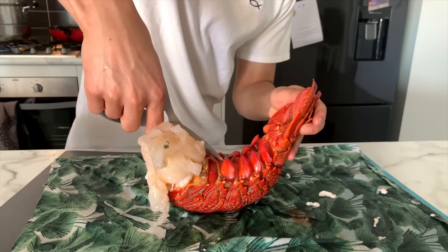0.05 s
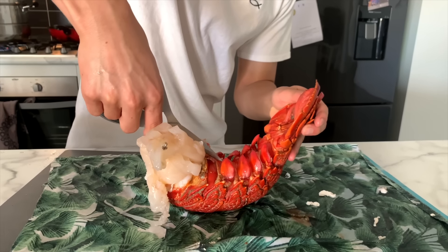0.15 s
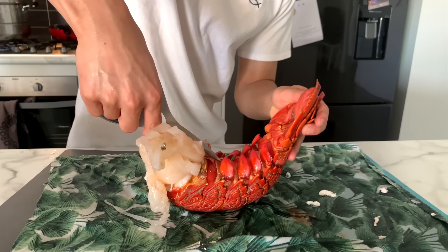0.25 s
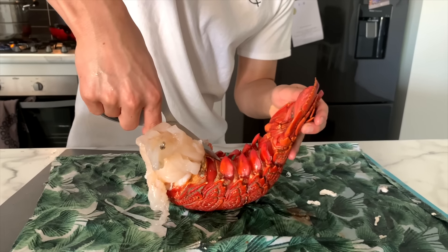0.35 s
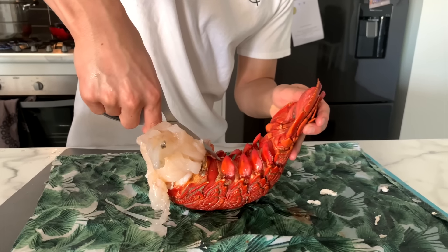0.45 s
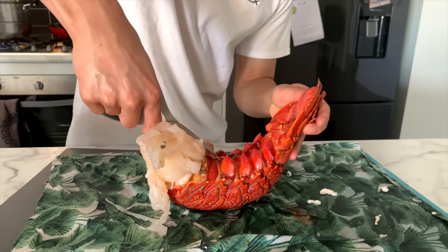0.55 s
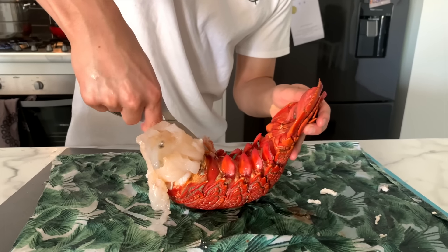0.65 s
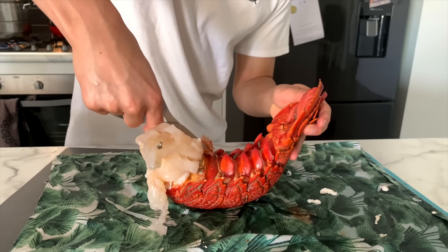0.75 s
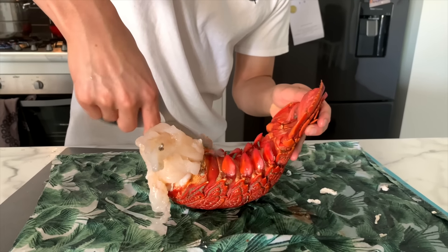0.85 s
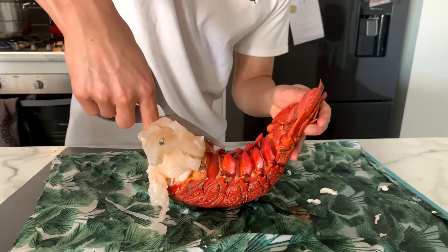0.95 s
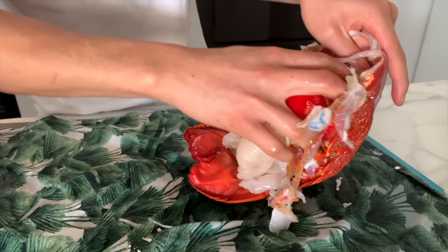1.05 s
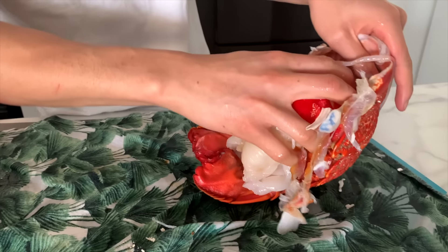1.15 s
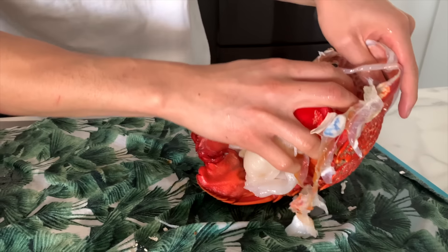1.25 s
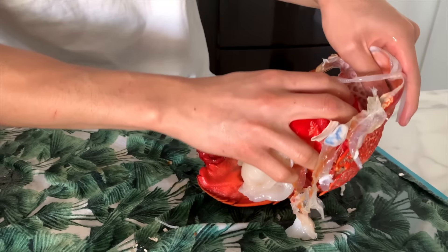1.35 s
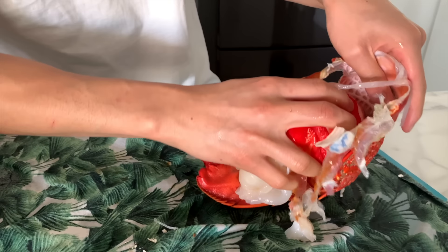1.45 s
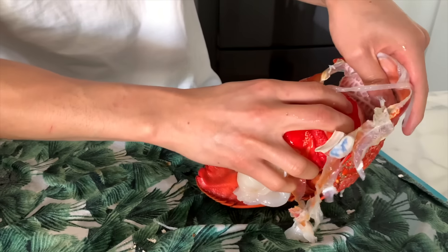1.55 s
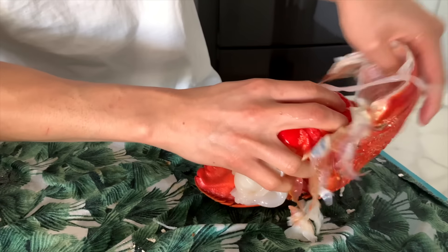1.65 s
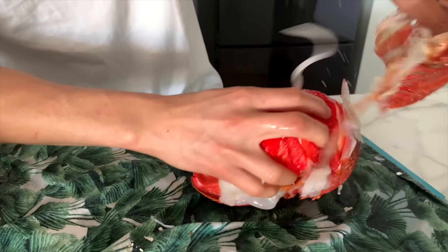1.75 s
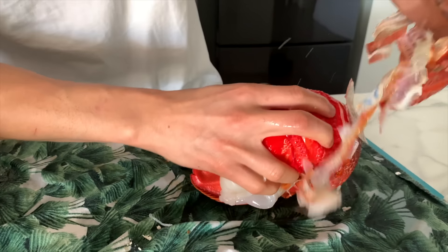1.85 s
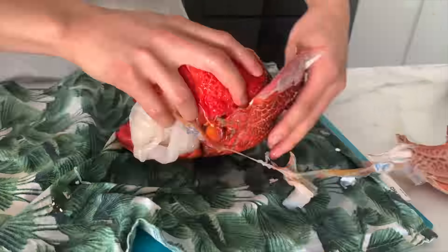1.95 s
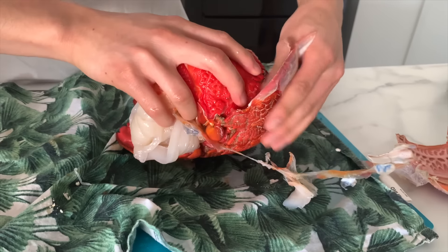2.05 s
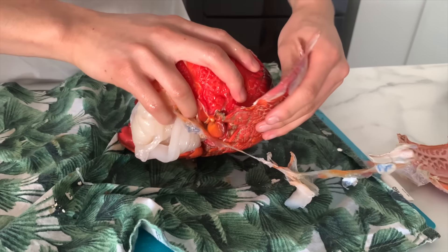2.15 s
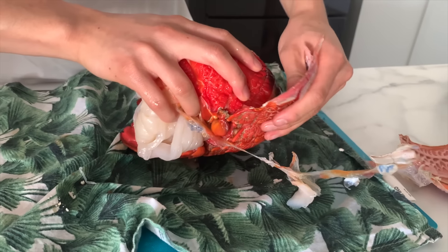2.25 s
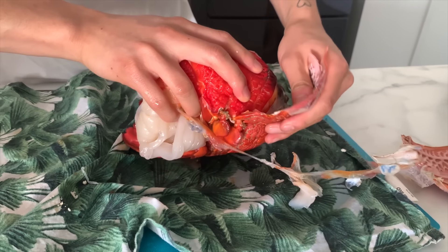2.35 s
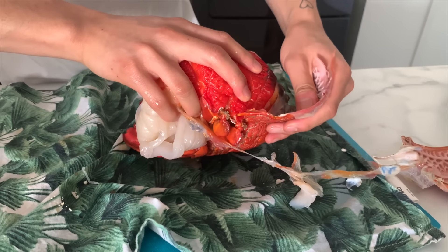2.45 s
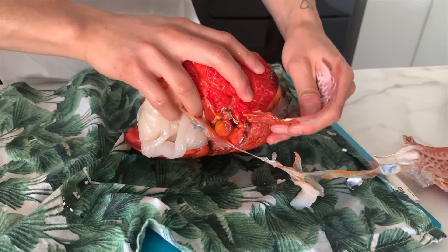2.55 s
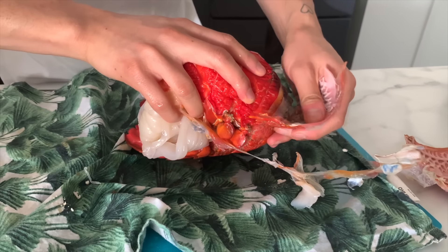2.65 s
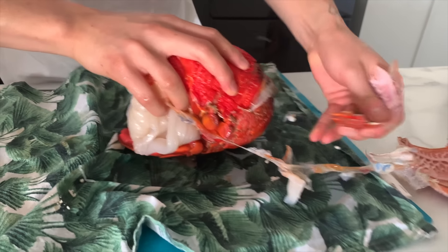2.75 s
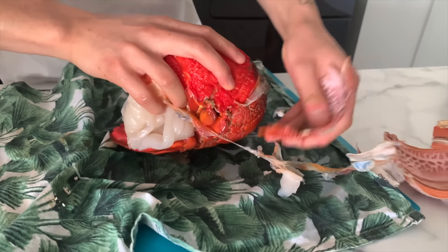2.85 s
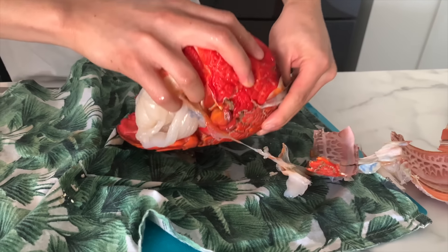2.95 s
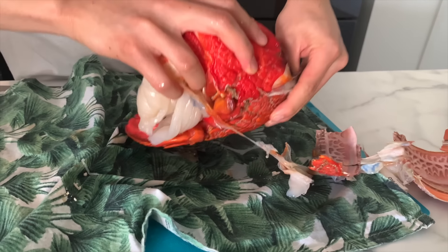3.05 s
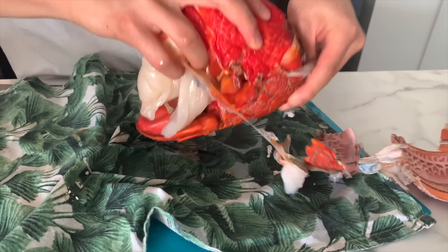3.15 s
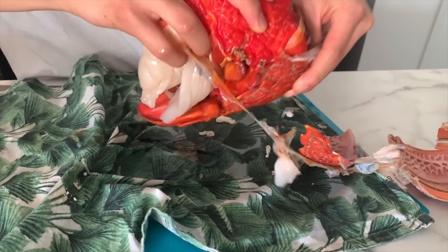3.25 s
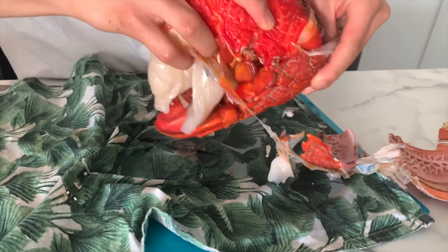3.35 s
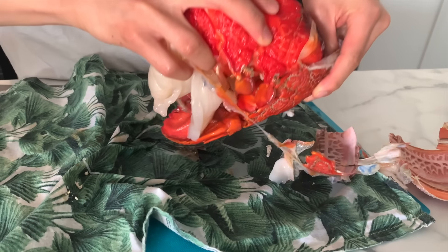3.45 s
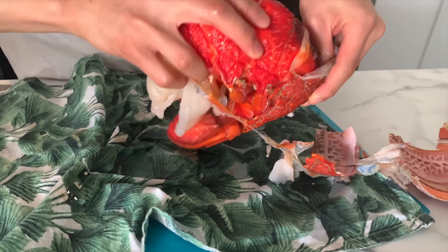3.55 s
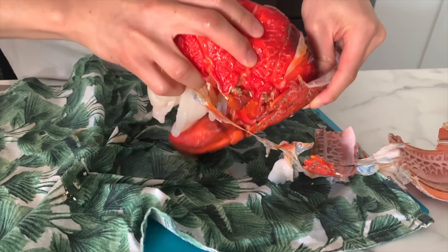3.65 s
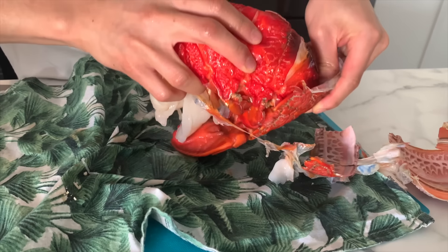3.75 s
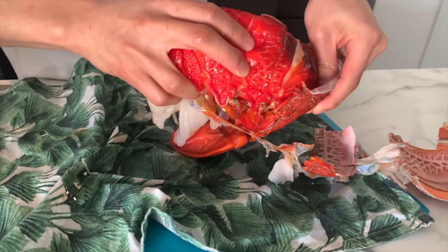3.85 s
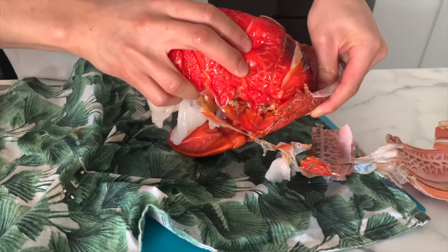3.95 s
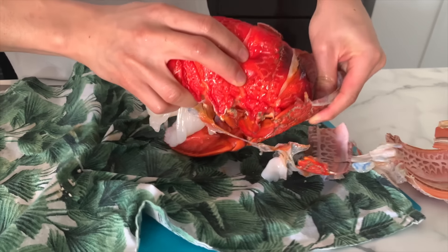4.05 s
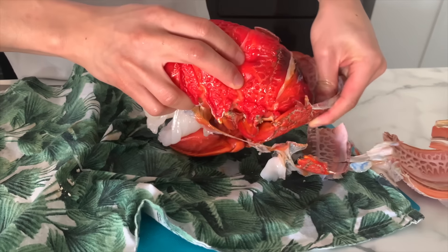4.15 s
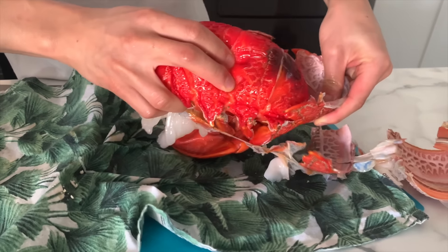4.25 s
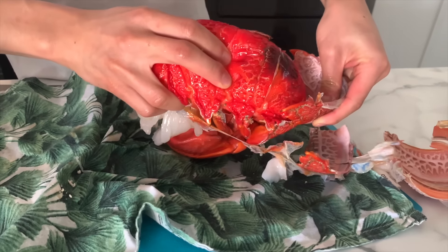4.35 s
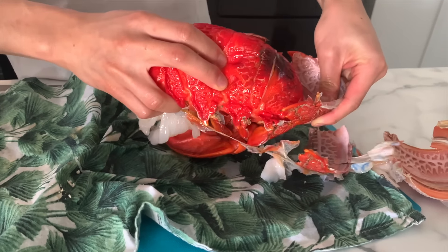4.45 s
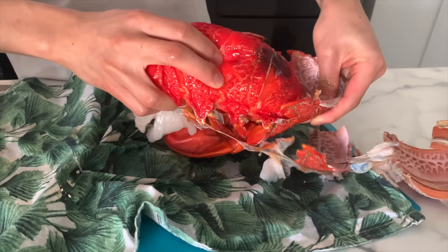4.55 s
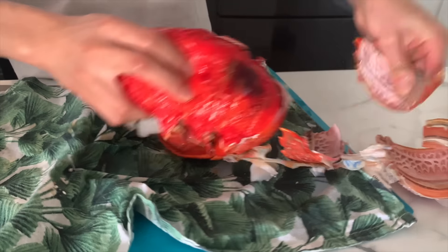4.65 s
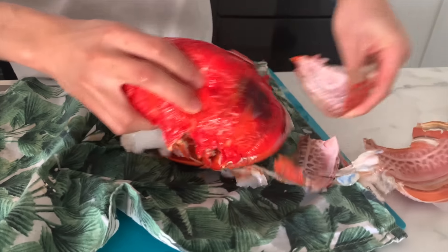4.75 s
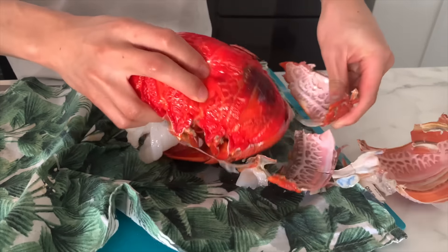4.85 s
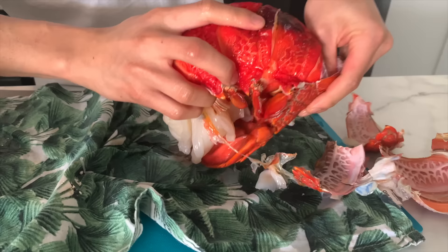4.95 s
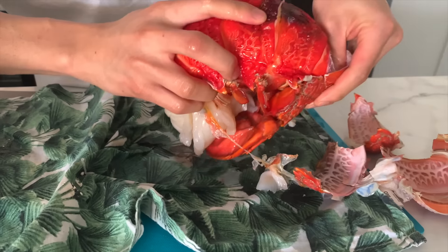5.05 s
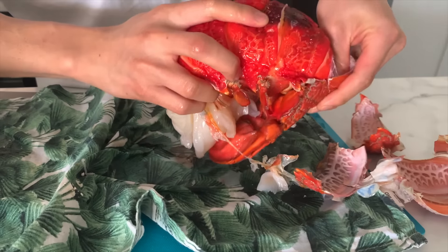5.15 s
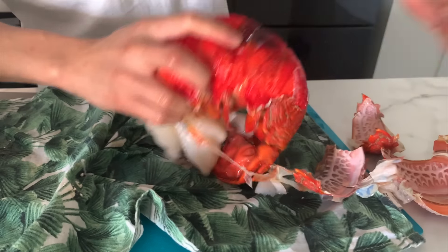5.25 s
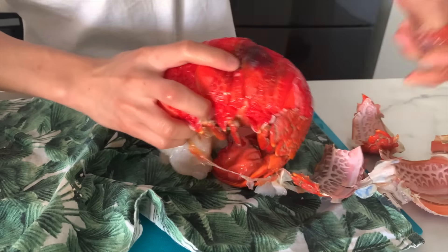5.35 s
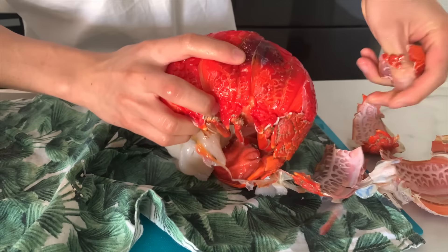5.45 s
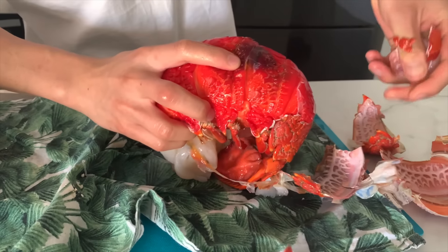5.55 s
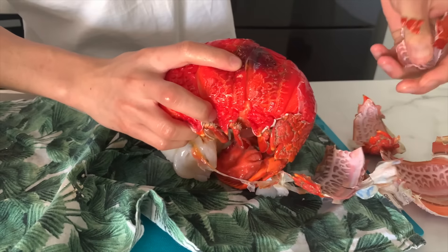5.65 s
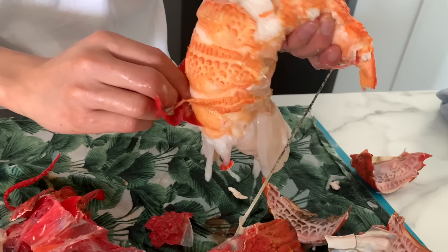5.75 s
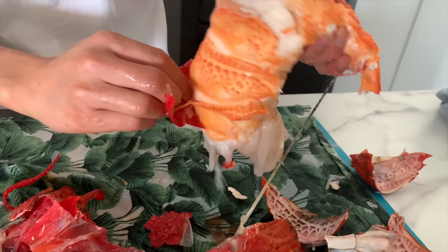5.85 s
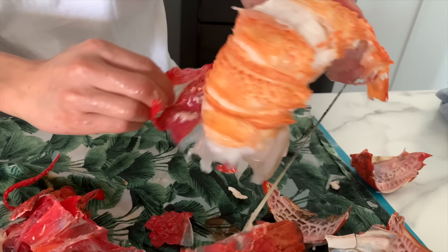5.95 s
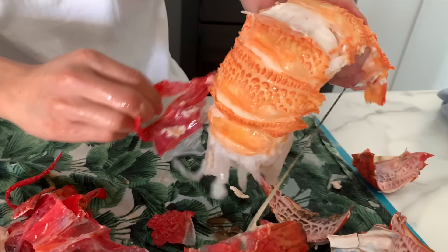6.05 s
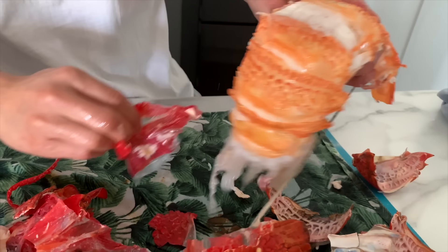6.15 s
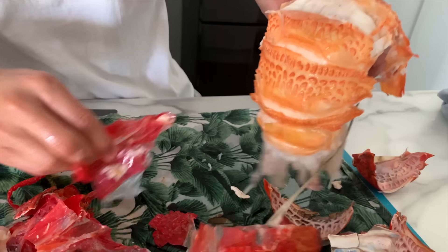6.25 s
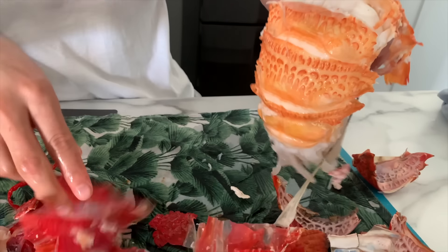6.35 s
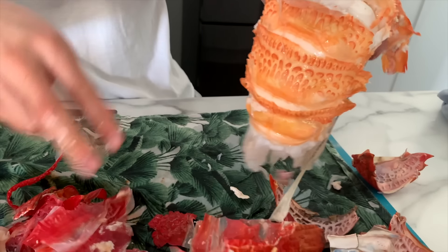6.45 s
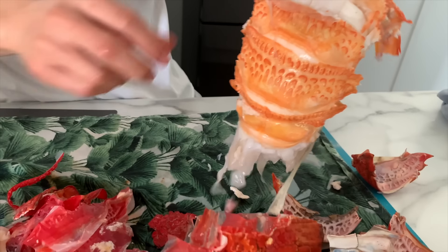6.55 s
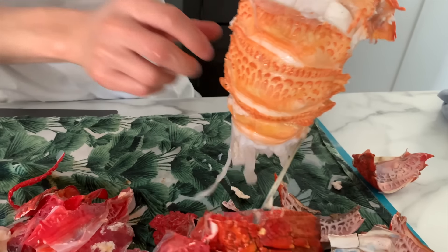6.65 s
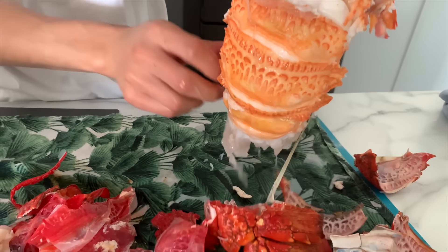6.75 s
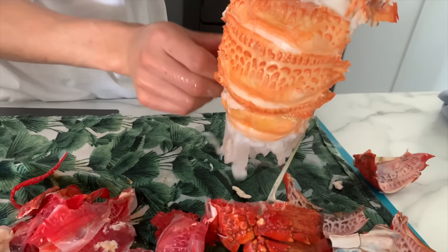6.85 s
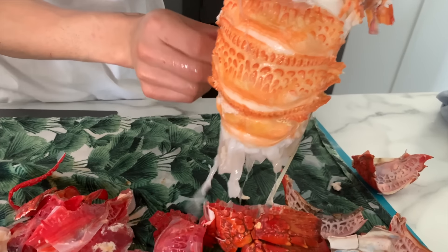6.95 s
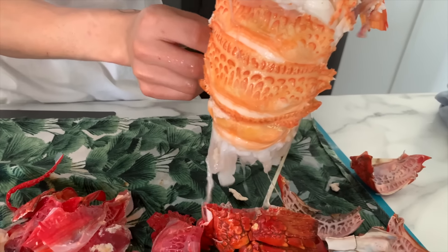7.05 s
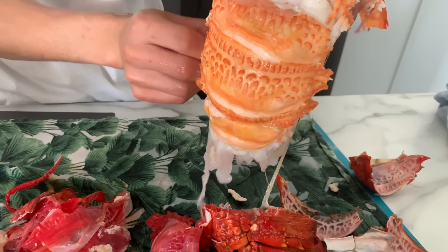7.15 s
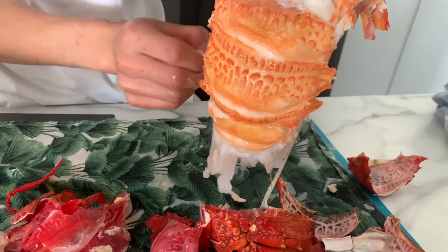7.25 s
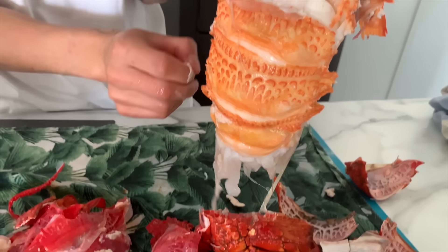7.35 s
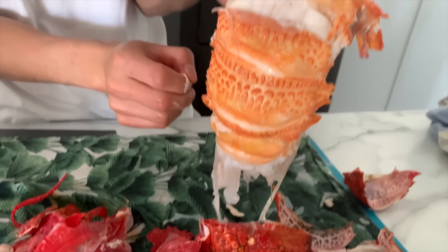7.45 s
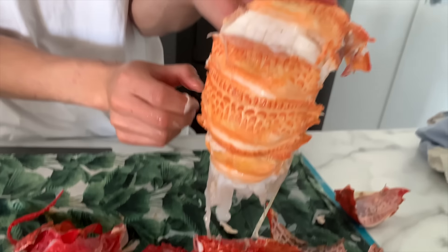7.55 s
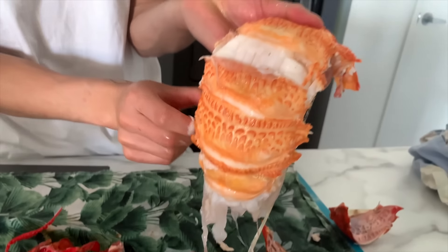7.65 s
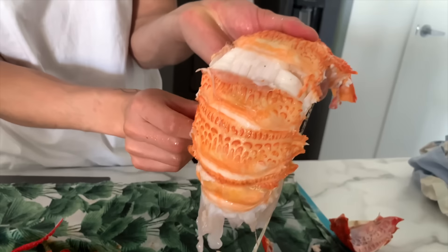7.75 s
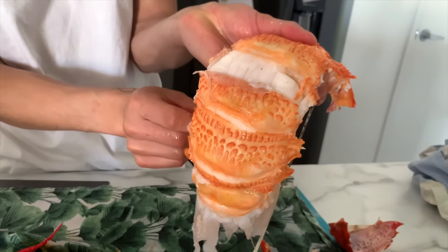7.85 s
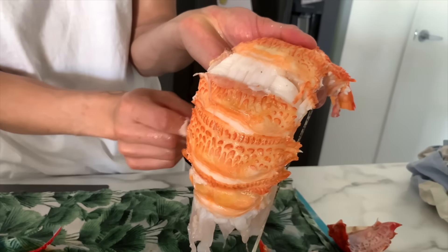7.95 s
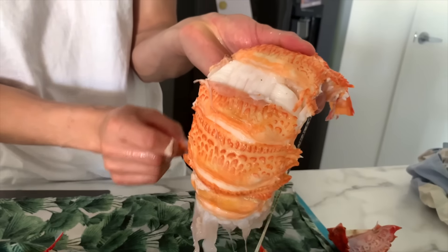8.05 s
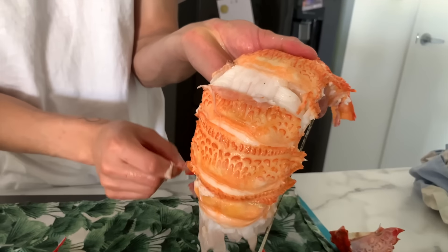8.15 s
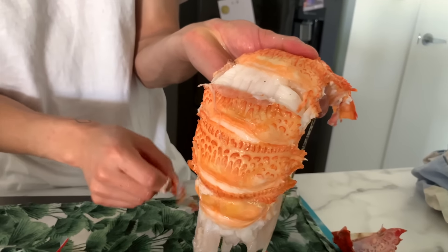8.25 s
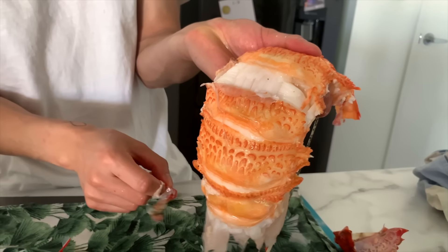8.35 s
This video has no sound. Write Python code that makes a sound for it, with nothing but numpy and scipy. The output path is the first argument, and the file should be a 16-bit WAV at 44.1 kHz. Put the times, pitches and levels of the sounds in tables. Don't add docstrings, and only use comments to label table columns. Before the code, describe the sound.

In a hard, bare kitchen with a low steady appliance hum and faint hiss, hands work a lobster shell very close to a stereo microphone. From 0 to 0.35 s fingers slide and small slivers click. Snaps start near 0.4 s, with a sharper split and wet rip at 0.6 s. A loud cluster cracks at 1.2-1.4 s, another with tearing and squelching at 1.55-1.65 s. A soft board knock comes at 2.0 s, then snaps at 2.2 and 2.6 s, and single or paired breaks around 3.0, 3.5, 3.9 and 4.15 s. Dense, overloaded bursts hit at 4.55 and 5.15 s. Each rings briefly off the walls, the tail sometimes cut short. A hollow pop sounds at 5.4 s. Light clicks, knocks and membrane rustle follow near 5.7-6 s, a soft pop at 6.5 s, then almost only hum and faint ticks until 8.4 s.

```python
import sys
import numpy as np
from scipy import signal
from scipy.fft import rfft, irfft
from scipy.io import wavfile
from scipy.ndimage import uniform_filter1d, minimum_filter1d

SR = 44100
rng = np.random.default_rng(int(sys.argv[2]) if len(sys.argv) > 2 else 0)


def transcribe(u):
    v = np.clip(np.atleast_2d(u).T, -1, 1)
    q = np.round(v * 32767).astype(np.int16)
    wavfile.write(sys.argv[1], SR, q)


def decibels_to_gain(level_db):
    exponent = np.asarray(level_db, float) / 20
    return 10 ** exponent


N = 370440

# pitch_hz, likeness (-1 to 1)
LEFT_RIGHT_LIKENESS = [(60, 0.91), (240, 0.97), (950, -0.027), (3770, -0.24), (15000, 0.76)]


def at_hz(points, hz, order=1):
    table = np.array(points)
    return np.interp(np.log(hz + 1), np.log(table[:, 0] + 1), table[:, order])


def rms_one(x):
    return x / np.sqrt(np.mean(x ** 2) + 1e-20)


def resonance(x, hz, width_hz):
    r = np.exp(-np.pi * width_hz / SR)
    turn = 2 * r * np.cos(2 * np.pi * hz / SR)
    return signal.lfilter([(1 - r * r) / 2, 0, (r * r - 1) / 2], [1, -turn, r * r], x)


def band(x, low_hz, high_hz):
    sos = signal.butter(2, [low_hz, min(high_hz, .45 * SR)], "band", fs=SR, output="sos")
    return signal.sosfilt(sos, x)


def add(out, s, sound):
    at = max(round(s * SR), 0)
    out[:, at:at + sound.shape[1]] += sound[:, :N - at]


def widen(mid, side, hz):
    alike = at_hz(LEFT_RIGHT_LIKENESS, hz)
    return np.sqrt(1 + alike) * mid + np.sqrt(1 - alike) * side * [[1], [-1]]


def hum():
    # pitch_hz, level_db per Hz
    air_colour = [(15, -35), (63, -2.5), (209, -13), (450, -22), (1150, -10.5), (2290, -24), (6500, -36.5),
                  (14300, -40.5)]
    # time_s, level_db
    air_level = [(0.0, -56.5), (1.24, -55), (1.349, -51.5), (2.24, -57.5), (5.01, -53), (5.31, -61),
                 (5.78, -54.5), (8.4, -55.5)]
    # pitch_hz, width_hz, level_db
    air_whistles = [(66, 14, -69.5), (121, 14, -73.5), (1065, 300, -71.5), (2240, 300, -74),
                    (7660, 330, -71.5), (10180, 2200, -79.5), (13300, 2000, -76.5)]
    hz = np.fft.rfftfreq(N, 1 / SR)
    colour = decibels_to_gain(at_hz(air_colour, hz))
    mid, side = rfft(rng.standard_normal((2, N))) * colour
    air = rms_one(irfft(widen(mid, side, hz), N))
    white = irfft(rfft(air) / colour, N)
    whistles = 0
    for pitch_hz, width_hz, level_db in air_whistles:
        tone = resonance(resonance(white, pitch_hz, width_hz), pitch_hz, width_hz)
        whistles = whistles + decibels_to_gain(level_db) * rms_one(tone)
    time_s, level_db = np.transpose(air_level)
    return decibels_to_gain(np.interp(np.arange(N) / SR, time_s, level_db)) * air + whistles


def kitchen(dry, build_s=0.0017):
    # pitch_hz, level_db, t60_s (time to fall by 60 dB)
    room_ring = [(200, -53.5, 0.87), (504.4, -51.5, 0.83), (1220, -49.5, 1.3), (2300, -44.5, 0.92),
                 (4500, -43.5, 0.84), (9075, -49, 0.62), (15360, -60, 0.62)]
    scene_changes = [0, 1.003, 1.988, 2.94, 4.973, 5.758, 8.4]
    t = np.arange(SR) / SR
    echoes = rng.random(SR) < 250 / SR
    sparse = 1 + 96 * uniform_filter1d(1. * echoes, size=24) * np.exp(-t / 0.015)
    white = rng.standard_normal((2, 2, SR)) * sparse
    tail, edges = 0, 120 * 2 ** np.arange(0, 7.1, .5)
    for k, (low, high) in enumerate(zip(edges, edges[1:])):
        hz = np.sqrt(low * high)
        decay_db = at_hz(room_ring, hz) - 60 * t / at_hz(room_ring, hz, order=2)
        mid, side = band(white[k % 2], low, high) * decibels_to_gain(decay_db)
        tail = tail + widen(mid, side, hz)
    tail = tail * (1 - np.exp(-t / build_s))
    out = np.zeros((2, N))
    cuts = [round(s * SR) for s in scene_changes]
    for a, b in zip(cuts, cuts[1:]):
        source = dry[:, a:b].mean(axis=0, keepdims=True)
        out[:, a:b] = signal.fftconvolve(source, tail, axes=1)[:, :b - a]
    return out


def knocks():
    # start_s, peak_db, pitch_hz, t60_s (time to fall by 60 dB)
    board_knocks = [(0.61, -42.5, 125, 0.1), (0.82, -45, 121, 0.075), (1.62, -33, 283, 0.085),
                    (2.024, -27, 350, 0.044), (2.26, -30, 464, 0.025), (2.621, -45, 117, 0.11),
                    (2.815, -30, 267.6, 0.073), (4.889, -29, 620, 0.02), (5.075, -50, 108.4, 0.15),
                    (5.865, -27, 416, 0.021), (5.928, -28.5, 160, 0.022)]
    out, t = np.zeros((2, N)), np.arange(5000) / SR
    noises = rng.standard_normal((len(board_knocks), 2, len(t)))
    for (s, peak_db, hz, t60), noise in zip(board_knocks, noises):
        shape = (1 - np.exp(-t / 0.012)) * decibels_to_gain(-60 * t / t60)
        puff = rms_one(band(band(noise, 250, 1100), 150, 1400)) * np.exp(-t / .015)
        tone = .75 * np.sin(2 * np.pi * hz * t)
        add(out, s, decibels_to_gain(peak_db + 12.5) * shape * (tone + .8 * puff))
    return out


def rustles(per_s=2000, spread_db=2.0, fade_db=7.5):
    # start_s, length_s, level_db
    tears = [(.187, .025, -41), (.19, 0.27, -43.5), (.575, 0.052, -29.5), (.78, 0.086, -38.5),
             (1.59, 0.062, -23), (2.19, 0.21, -35), (4.99, 0.089, -54.5), (5.75, 0.27, -61),
             (5.81, .24, -44.5), (6.29, 0.089, -53.5), (7.95, .07, -54)]
    # start_s, length_s, level_db
    slides = [(0, 0.203, -51), (.97, 0.19, -60), (1.954, 0.41, -57.5), (2.64, 0.15, -33), (2.99, .2, -43.5),
              (4.11, 0.22, -37), (4.521, 0.011, -30.5), (5.119, .022, -27), (5.25, 0.4, -36.5),
              (6.55, 0.16, -59.5), (6.8, 0.12, -62.5), (7.23, 0.16, -66), (8.25, 0.027, -68.5)]
    # start_s, length_s, level_db
    squelches = [
        (.05, 0.61, -54),
        (.581, 0.037, -33),
        (1.6, .05, -30.5),
        (2.66, 0.098, -36.5),
        (3.04, .08, -42.5),
        (4.53, .06, -25),
        (6.54, 0.14, -52.5),
    ]
    # start_s, length_s, level_db
    palms = [
        (1.98, 0.16, -47.5),
        (2.58, 0.075, -53),
        (2.77, .17, -44),
        (5.82, 0.227, -48.5),
    ]
    kinds = [(tears, (2300, 12500)), (slides, (1800, 6000)),
             (squelches, (750, 1960)), (palms, (200, 800))]
    wander = signal.lfilter([1], [1, -.998], rng.standard_normal(N))
    clumps = decibels_to_gain(6.3 * rms_one(wander))
    sizes = decibels_to_gain(spread_db * np.minimum(rng.exponential(1, N), 5)) * rng.choice([-1, 1], N)
    clicks = sizes * (rng.random(N) < per_s * clumps / SR)
    grains = clicks + 0.31 * rng.standard_normal((2, N))
    out = np.zeros((2, N))
    for moves, (low_hz, high_hz) in kinds:
        for s, length, level_db in moves:
            move = grains[:, round(s * SR):round((s + length) * SR)]
            count = move.shape[1]
            swell = signal.windows.tukey(count, .4) * decibels_to_gain(np.linspace(0, -fade_db, count))
            rub = band(band(move, low_hz, high_hz), 0.52 * low_hz, 3.4 * high_hz)
            add(out, s, decibels_to_gain(level_db) * swell * rms_one(rub))
    return out


def fractures():
    # start_s, level_db, pitch_hz
    splits = [(0.4789, -20, 4460), (0.5982, -6, 5280), (1.5679, -8, 1972), (1.6098, 3.86, 4190),
              (1.6346, 0, 1481), (2.2099, -17, 3244), (2.3153, -18, 4030), (2.3314, -18.5, 3310),
              (2.4816, -15.5, 5930), (2.5714, -13.5, 3120), (2.5865, 2, 3180), (2.606, 2.5, 2937),
              (3.5533, -3, 3830), (3.5762, -7, 5010), (3.7064, -10.5, 4870), (3.8123, -23.5, 3166),
              (3.8484, -16, 3755), (4.1371, 5, 2950), (4.2153, -14, 2980), (4.5325, 4, 5320),
              (4.5395, -1.9, 2990), (4.5612, 4, 2980), (4.571, 0.5, 2896), (5.1345, 4, 3940),
              (5.1581, -5, 3005), (5.1611, -2, 4827), (5.6538, -17.5, 4260), (5.9748, -15, 2130),
              (6.9591, -44.5, 6000), (8.3705, -43, 4820)]
    # start_s, level_db, pitch_hz
    clean_snaps = [(0.3796, -13.5, 4040), (0.7974, -25.5, 3540), (0.8073, -15.5, 4500),
                   (1.1891, -0.2, 1950), (1.2093, -0.9, 1800), (1.228, -3.5, 1800), (1.3572, 1.5, 1740),
                   (1.5482, -6.5, 2620), (1.6125, -2.5, 4000), (1.6288, -3.5, 2797), (2.1952, -15, 3190),
                   (2.2244, 2, 3300), (2.2366, -2, 2940), (2.2657, -14, 2240), (2.6159, -18.5, 4370),
                   (2.9619, -19.5, 4400), (3.0361, 0.5, 2070), (3.4364, 1, 2350), (3.9075, 4, 2670),
                   (4.1408, -2, 4500), (4.5424, -1, 5274), (4.546, -7, 4000), (5.1376, -1.5, 2600),
                   (5.1462, 0.5, 3180), (5.183, -6.5, 2543), (5.6573, -30.5, 2460), (5.8468, -29.5, 2080)]
    # start_s, level_db,
    # pitch_hz
    cracks = [(0.3553, -29.5, 4360), (0.5901, -17, 4590), (0.7839, -24.5, 4400), (1.207, -3.5, 2057),
              (1.3674, -12, 3900), (1.5222, -24, 2444), (1.5538, -4, 1711), (1.6173, -9, 4003),
              (1.6261, -15.5, 1742), (2.5926, -13, 2574), (2.5963, -12, 4208), (3.0616, -7, 2360),
              (3.4464, -12.5, 3425), (3.527, 0.9, 2487), (3.536, -9, 2710), (3.9172, -7.5, 3845),
              (4.1168, -21, 2280), (4.1266, -12, 2713), (4.1507, -12, 3272), (4.2043, -4.5, 3136),
              (4.5366, 0.5, 3311), (4.5518, -17.5, 3840), (5.1508, -4.5, 5004), (5.1648, -14, 4473),
              (5.1834, -3.5, 4200), (5.1868, -15, 4100), (5.1887, -1, 4140), (1.2287, -4.5, 4900)]
    # start_s, level_db, pitch_hz
    pops = [
        (1.2175, -12.5, 1800),
        (1.243, -14.5, 1733),
        (2.0261, -52, 1037),
        (2.824, -28, 846),
        (5.4285, -11, 1350),
        (5.4288, -21, 2370),
        (6.5267, -30, 1110),
        (6.527, -42, 1660),
        (7.9625, -41, 1629),
    ]
    # start_s, level_db, pitch_hz
    slivers = [(0.0068, -38, 2900), (0.1974, -34, 3470), (0.19, -32, 4500), (0.2119, -27.5, 3500),
               (0.2256, -30, 3900), (0.2619, -38.5, 4140), (0.2798, -33, 4400), (0.2889, -31.5, 4220),
               (0.3119, -31, 4500), (0.8038, -26, 3400), (0.8113, -30.5, 3360), (1.881, -32, 1530),
               (2.988, -30.5, 2830), (3.006, -32.5, 2300), (5.8722, -29, 5520), (5.8956, -30.5, 4120),
               (5.8966, -23, 7110), (5.9292, -36.5, 3420), (5.9326, -25.5, 7290), (5.9917, -33, 2252),
               (8.26, -48, 3200)]
    # start_s, level_db
    ticks = [(0.409, -27), (0.4826, -31.5), (1.5953, -19.5), (2.4914, -29.5), (2.515, -26.5), (2.8971, -33),
             (5.036, -41), (5.6954, -29.5), (5.7, -30.5), (5.736, -36.5), (5.8685, -28), (6.3079, -44),
             (6.345, -42), (6.605, -48.5)]
    tick_rows = [(s, level_db, 4277) for s, level_db in ticks]
    kinds = [(splits, (-0.38, -34)), (clean_snaps, (-1.2, -33)), (cracks, (-5.5, -37.5)),
             (pops, (-29, -33)), (slivers, (-2.5, -22)), (tick_rows, (1.03, -32))]
    return [(*row, *kind) for rows, kind in kinds for row in rows]


def snaps(burst_s=0.00046, rise_s=0.0006, lead_in_db=-24):
    out, sent, t = np.zeros((2, N)), np.zeros((1, N)), np.arange(900) / SR
    click = 1. * (t == 0)
    alike, left_db, right_lag_s = .78, -1, 1 / SR
    events = fractures()
    noises = rng.standard_normal((len(events), 4, len(t)))
    spreads = rng.uniform(0.83, 1, (len(events), 2))
    for (s, level_db, hz, bright_db, push_db), noise, spread in zip(events, noises, spreads):
        length = burst_s * decibels_to_gain(0.28 * (level_db + 9.5))
        rise = rise_s * decibels_to_gain(0.3 * level_db)
        fall = np.exp(-t / length) + 0.12 * decibels_to_gain(0.27 * level_db) * np.exp(-t / 0.0044)
        shape = (1 - np.exp(-(t / rise) ** 2)) * fall
        crack = shape * (alike * noise[0] + (1 - alike) * noise[1:3])
        body = resonance(crack, hz, 260) + 0.35 * band(crack, 0.7 * hz, 1.39 * hz)
        for ratio, chance in zip((1.45, 2.1), spread):
            partner_hz = min(hz * ratio * (1 + 0.16 * chance), 5900)
            body = body + 0.27 * resonance(crack, partner_hz, 870)
        body = band(band(body, 0.27 * hz, 2.4 * hz), 0.35 * hz, 7.1 * hz)
        body = rms_one(body) + 0.088 * rms_one(band(crack, 400, hz))
        share = min(decibels_to_gain(bright_db), .99)
        plain = np.sqrt(1 - share ** 2)
        spit = rms_one(band(crack, 7500, 19000))
        push = decibels_to_gain(push_db) * rms_one(band(shape, 49, 1200))
        sound = plain * rms_one(body) + share * spit + push
        power = uniform_filter1d(np.mean(sound ** 2, axis=0), size=36)
        gain = decibels_to_gain(level_db + 2.5) / np.sqrt(np.max(power) * 2)
        s -= rise / 2
        add(out[:1], s, gain * decibels_to_gain(left_db) * sound[:1])
        add(out[1:], s + right_lag_s, gain * sound[1:])
        lead_in = band(noise[3], 1500, 8000) * np.exp((t - t[-1]) / 0.0054)
        add(out, max(s - t[-1], 0), decibels_to_gain(level_db + lead_in_db) * lead_in * [[.3], [1]])
        hump = band(band(click, 0.54 * hz, 2.3 * hz), 0.16 * hz, 5.3 * hz)
        hump = hump + 1.2 * resonance(click, hz, 350) + 0.042 * band(click, 320, hz)
        sent_spit = rms_one(band(click, 6200, 23000))
        around = plain * rms_one(hump) + share * sent_spit + 3.8 * push
        add(sent, s, gain * around[None])
    return out, sent


def scene():
    direct, sent = snaps()
    hands = knocks() + rustles()
    air = hum() * decibels_to_gain(np.array([[-.4], [.4]]))
    return direct + hands + kitchen(sent + hands) + air


def low_pass(x):
    return signal.sosfilt(signal.butter(12, 15900, fs=SR, output="sos"), x)


def record(dry):
    # pitch_hz, width_hz, depth (0 to 1)
    treble_dips = [(8765, 720, 0.7), (11745, 990, 1), (14800, 3300, 0.4)]
    # low_hz, high_hz
    lost_bands = [(11300, 12400), (14450, 22000)]
    for pitch_hz, width_hz, depth in treble_dips:
        dry = dry - depth * resonance(dry, pitch_hz, width_hz)
    dry = signal.sosfilt(signal.butter(6, 15000, fs=SR, output="sos"), dry)
    x, hz = np.clip(dry, -1, 1), np.fft.rfftfreq(N, 1 / SR)
    treble = np.mean(band(x, 9000, 15000) ** 2, axis=0)
    sudden = uniform_filter1d(treble, size=90) > decibels_to_gain(16) * uniform_filter1d(treble, size=2048)
    between = uniform_filter1d(minimum_filter1d(1. - sudden, size=800), size=300)
    weak = sum((hz > low) & (hz < high) for low, high in lost_bands)
    weak = uniform_filter1d(1. * weak, size=1500)
    x = x - irfft(rfft(between * x) * weak, N)
    return low_pass(np.clip(x, -1, 1))


dry = scene()
out = record(dry)
transcribe(out)
```